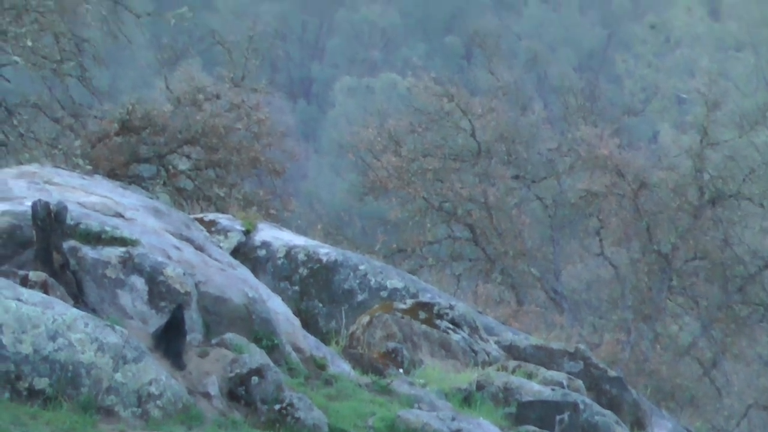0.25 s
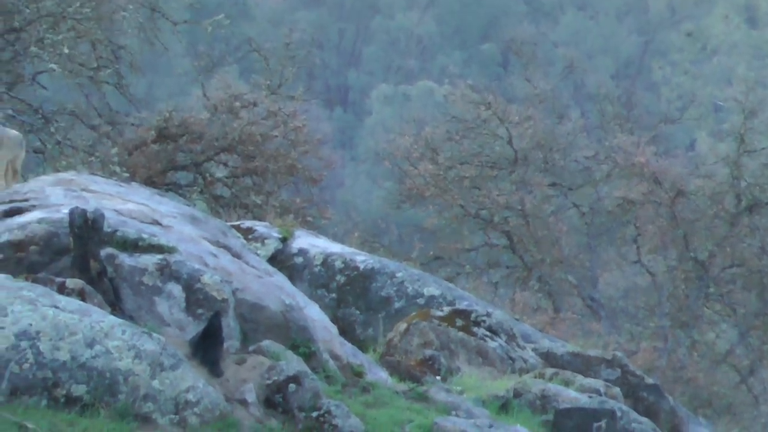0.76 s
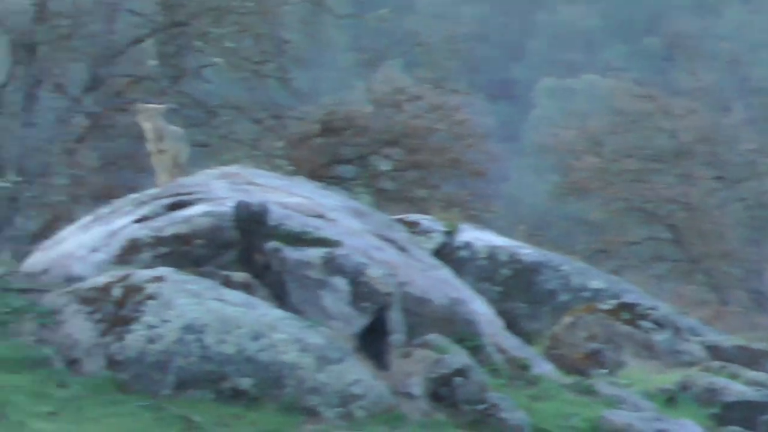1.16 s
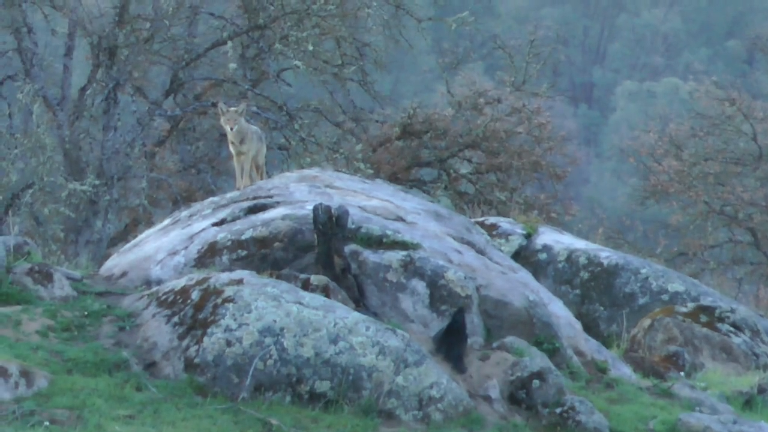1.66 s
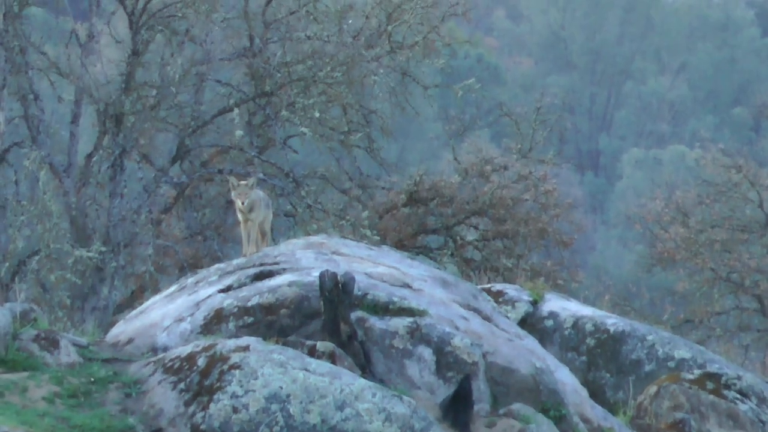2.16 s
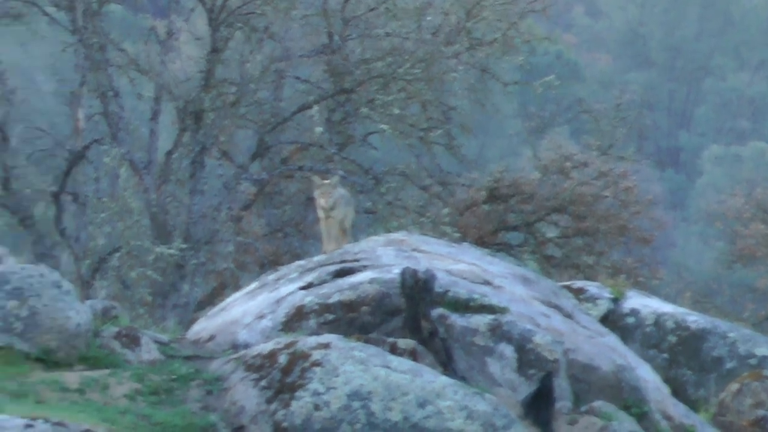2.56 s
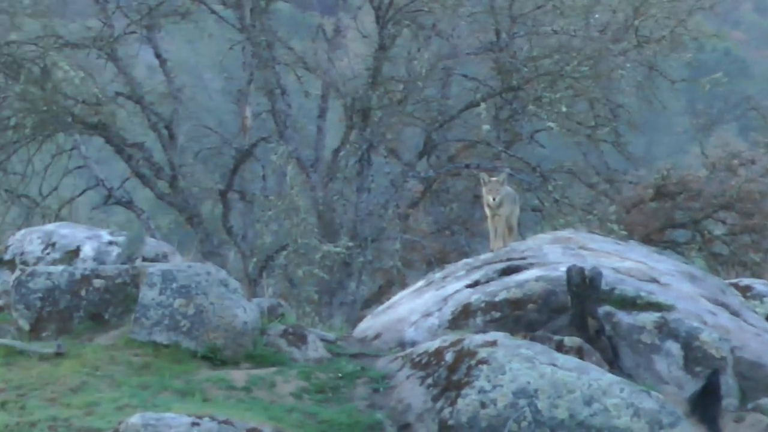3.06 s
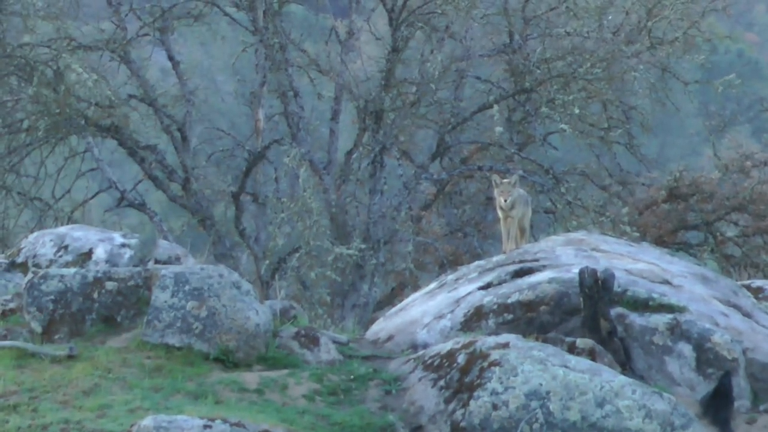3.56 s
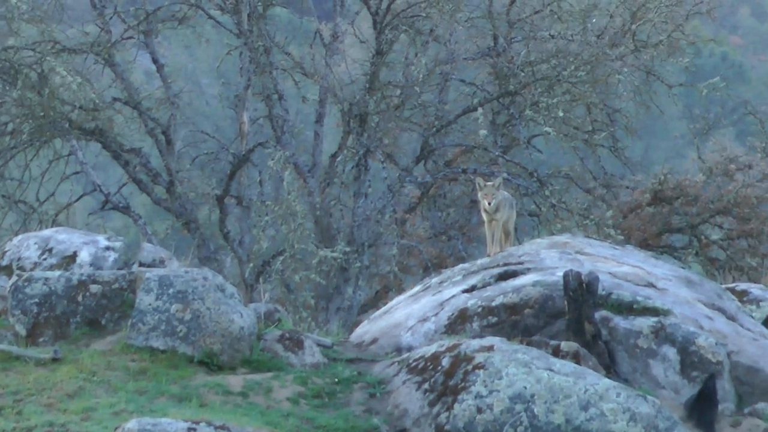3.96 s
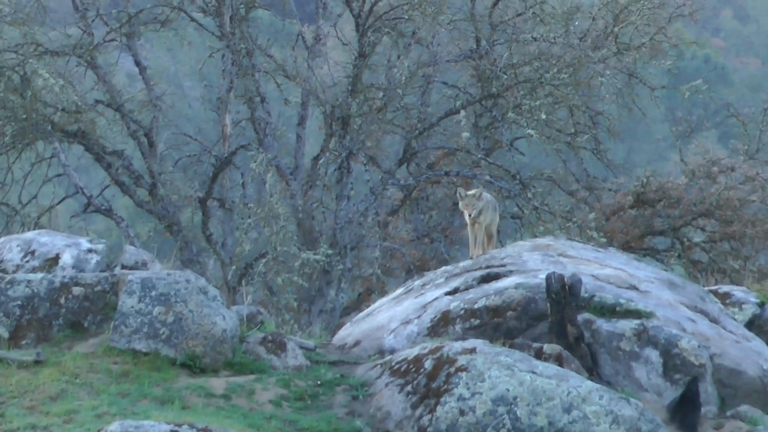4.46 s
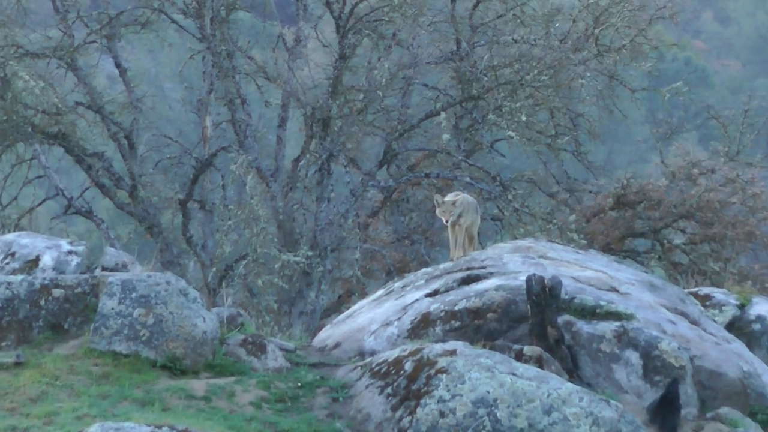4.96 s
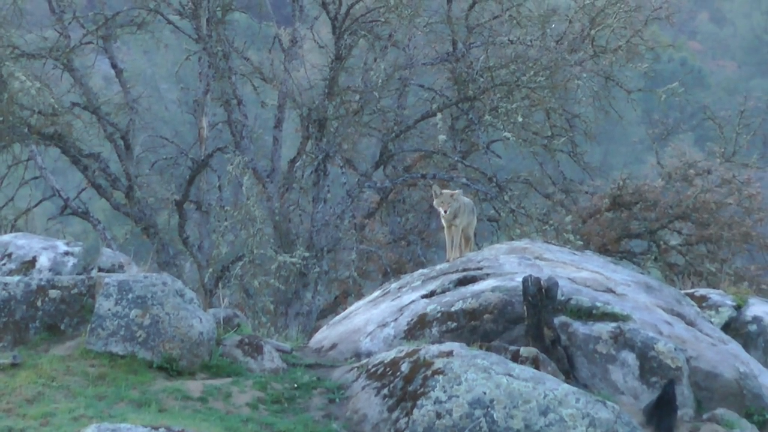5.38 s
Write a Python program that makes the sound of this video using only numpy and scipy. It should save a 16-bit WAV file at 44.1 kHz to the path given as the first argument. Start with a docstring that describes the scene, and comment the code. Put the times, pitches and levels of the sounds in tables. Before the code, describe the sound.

Five hoarse, yelping coyote barks ring across an open hillside among chirping birds, faint rumble and hiss, and a few camera handling clicks.

```python
"""A wooded hillside: on a boulder a coyote gives five rough barks, a falling tone of fluttering vocal folds
shaped by throat and mouth; each drops in pitch at a break and dies away into a whine.
Small birds whistle and buzz in the trees as trembling sines, and slopes and trees answer with noise-like echoes.
Low rumble and faint hiss, both coloured noise, lie beneath; damped rings make the hand-held camera's clicks."""
import sys
import numpy as np
from scipy import signal
from scipy.fft import rfft, irfft, next_fast_len
from scipy.io import wavfile
from scipy.ndimage import uniform_filter1d

SR = 44100
rng = np.random.default_rng(int(sys.argv[2]) if len(sys.argv) > 2 else 0)


def unload_wav(signal):
    """Save mono or channel-first audio to the path in sys.argv[1] as 16-bit WAV at rate SR, clipped to [-1, 1]."""
    wavfile.write(
        sys.argv[1],
        SR,
        np.round(np.clip(np.atleast_2d(signal).T, -1, 1) * 32767).astype(np.int16),
    )


N = 247842
TIME = np.arange(N) / SR


def from_db(db):
    """Amplitude gain of a level in dB."""
    return 10 ** (np.asarray(db) / 20)


def rms_one(x):
    """Scale to an rms of 1."""
    return x / np.sqrt(np.mean(x ** 2) + 1e-20)


def in_time(rows, t):
    """The columns of a curve, read at the times t."""
    s, *columns = np.transpose(rows)
    return [np.interp(t, s, column) for column in columns]


def colour(x, points, power=1):
    """Filter by a (f/Hz, level/dB) spectrum raised to a power."""
    size = next_fast_len(x.shape[-1] + 4096)
    hz, db = np.transpose(points)
    bins_hz = np.maximum(np.arange(size // 2 + 1) * SR / size, 1)
    gain = from_db(power * np.interp(np.log(bins_hz), np.log(hz), db))
    return irfft(rfft(x, size) * gain, size)[..., :x.shape[-1]]


def cut(x, hz, kind, order=2):
    """Low-, high- or band-pass filter."""
    edges_hz = np.clip(hz, 10, .45 * SR)
    return signal.sosfilt(signal.butter(order, edges_hz, kind, fs=SR, output="sos"), x)


def formant(x, hz, width_hz):
    """A resonance with gain 1 at its peak."""
    return signal.lfilter(*signal.iirpeak(hz, hz / width_hz, fs=SR), x)


def wander(rate_hz, size):
    """Smooth random drift up to a given rate, with an rms of 1."""
    settle = 8000
    return rms_one(cut(rng.standard_normal(size + settle), rate_hz, "low")[settle:])


def level_out(x):
    """Hold the short-time rms near 1, so that the envelope sets the loudness."""
    power = uniform_filter1d(uniform_filter1d(x * x, 700), 700)
    return x / np.sqrt(np.maximum(power, 0) + 1e-12)


def fade(t, edge_s):
    """Soft start and stop."""
    return np.sin(np.pi / 2 * np.clip(np.minimum(t - t[0], t[-1] - t) / edge_s, 0, 1)) ** 2


def ease(age, at_s, over_s):
    """A smooth step from 0 to 1."""
    return .5 + .5 * np.tanh((age - at_s) / over_s)


def turn(hz):
    """Phase of a moving frequency."""
    return 2 * np.pi * np.cumsum(hz) / SR


def add(out, sound, t):
    """Mix a sound in at its times."""
    start = round(t[0] * SR)
    out[start:start + len(sound)] += sound


def air_noise(spectrum, side_share, pan_db):
    """Coloured noise: a shared centre plus a weaker, opposed part that widens it."""
    mid, side = colour(rng.standard_normal((2, N)), spectrum)
    wide = rms_one(mid) + side_share * rms_one(side) * np.array([[1], [-1]])
    return wide * from_db([[pan_db / 2], [-pan_db / 2]])


# level of the background over time: (t/s, rumble level/dB, leaf hiss level/dB)
AIR_LEVELS = [(0, -61.5, -57), (.85, -63.5, -55), (1.05, -67.5, -64), (2.3, -65.5, -63.5), (2.75, -62, -60),
              (3.3, -61, -60.5), (3.8, -60.5, -57.5), (4.8, -59, -56), (5.62, -59.5, -55)]
# spectrum of the low rumble: (f/Hz, level per Hz/dB)
RUMBLE_SPECTRUM = [(15, -76), (25, -16), (97, 0), (167, -5.5), (253, -0.5), (415, -2.5), (490, -11),
                   (532, -5.5), (660, -10), (766, -1.5), (904, -23), (1220, -16.5), (1300, -35.5),
                   (1690, -11.5), (2860, -120)]
# spectrum of the trees' distant rustle: (f/Hz, level per Hz/dB)
LEAF_SPECTRUM = [(700, -6), (1300, -3), (1750, 5.5), (2600, 7), (3700, 6), (4800, -0.5), (6500, -4),
                 (8500, -11), (12000, -10), (15500, -13)]


def air():
    """The background level changes over time, following one curve for the rumble and one for the leaf hiss,
    above a steady microphone hiss."""
    rumble_db, hiss_db = in_time(AIR_LEVELS, TIME)
    rumble = from_db(rumble_db) * air_noise(RUMBLE_SPECTRUM, side_share=0.53, pan_db=-4.0)
    leaves = from_db(hiss_db) * air_noise(LEAF_SPECTRUM, side_share=0.04, pan_db=0.5)
    microphone_hiss = from_db(-72.0) * rng.standard_normal(N)
    return rumble + leaves + microphone_hiss


# tone of the hillside's answer: (f/Hz, level/dB)
HILLSIDE_TONE = [(1000, 6), (1700, 3.5), (2200, -1.5), (4000, 6), (6000, -5), (10000, -1)]


def hillside(x, t60=0.81, far_db=-31, near_t60=0.03, near_db=-21):
    """Nearby rocks scatter the sound early; trees and slopes send back a faint long tail."""
    age = TIME[:2 * SR]
    build_up = np.clip(age / .015, 0, 1)
    near, far = rng.standard_normal((2, 2, len(age))) * build_up
    near = rms_one(near * from_db(-60 * age / near_t60))
    far = rms_one(far * from_db(-60 * age / t60))
    mid, side = (from_db(near_db) * near + from_db(far_db) * far) / np.sqrt(len(age))
    response = colour(mid + 0.11 * side * np.array([[1], [-1]]), HILLSIDE_TONE)
    return signal.fftconvolve(x[None], response, axes=1)[:, :N]


def rustle(start=4.8, end=4.9, level_db=-55):
    """A brief airy brush of coloured noise."""
    t = TIME[(TIME >= start) & (TIME <= end)]
    noise = colour(rng.standard_normal(len(t)), [(1000, -18), (3000, -10), (14000, -21.0)])
    return from_db(level_db) * fade(t, 0.0069) * rms_one(noise), t


# camera handling clicks: (t/s, starting level of the ring/dB, ring f/Hz, crack level relative to the ring/dB)
CAMERA_CLICKS = [ (1.112, -35, 2070, -9), (1.238, -54, 4000, 11), (1.599, -29, 2160, -20),
                 (1.602, -42, 236, -30), (1.632, -33.5, 2930, -11), (1.636, -32.5, 2670, -17),
                 (1.66, -34, 2650, -9), (1.718, -34, 4590, 1), (1.723, -34.5, 6440, -7),
                 (2.091, -43.5, 390, -33), (5.346, -44.5, 5800, 17)]


def clicks(ring_t60=0.019, crack_t60=0.018):
    """A short noise crack and one damped ring of the camera body."""
    out, age = np.zeros(N), TIME[:SR // 10]
    for s, ring_db, hz, crack_db in CAMERA_CLICKS:
        ring = np.sin(2 * np.pi * hz * age) * from_db(-60 * age / ring_t60)
        noise = cut(rng.standard_normal(len(age)), [1500, 8000], "band")
        crack = noise * from_db(crack_db - 60 * age / crack_t60)
        add(out, from_db(ring_db) * (ring + crack), s + age)
    return out


def whistle(start, end, first, middle, last, buzz, level_db, buzz_depth=0.095):
    """A near sine curving through three pitches; a fast tremble makes it buzz."""
    t = TIME[(TIME >= start) & (TIME <= end)]
    curve = np.polyfit([0, .5, 1], [first, middle, last], 2)
    pitch = np.polyval(curve, np.linspace(0, 1, len(t)))
    tremble = .005 * wander(80, len(t)) + buzz_depth * buzz ** 2 * wander(380, len(t))
    note = rms_one(np.sin(turn(pitch * (1 + tremble))) * from_db(2 * wander(59, len(t))))
    swell = fade(t, (end - start) / 2) ** .3
    return from_db(level_db) * swell * fade(t, .003) * note, t


# bouts of fainter, overlapping twitter from birds farther off: (start t/s, end t/s, note level/dB)
TWITTER_BOUTS = [ (0.0, 0.496, -64), (0.95, 1.551, -65.5), (2.1, 3.305, -73.5), (3.65, 5.2, -65)]


def twitter(notes_per_s=13):
    """Each bout scatters short whistles at random times and pitches."""
    out = np.zeros(N)
    for begin, end, level_db in TWITTER_BOUTS:
        # columns: start t/s, length/s, middle f/Hz, first and last pitch as a share of it
        lowest, highest = [max(begin, 0), .03, 2700, .8, .75], [end, .09, 5400, 1.2, 1.15]
        notes = rng.uniform(lowest, highest, (24, 5))
        for start, length, hz, first, last in notes[:round(notes_per_s * (end - begin))]:
            add(out, *whistle(start, start + length, hz * first, hz, hz * last, .3, level_db))
    return out


# one thin, high warble: (t/s, fundamental f/Hz)
WARBLE_PITCH = [(4.35, 5240), (4.4, 5950), (4.51, 5160), (4.66, 5850), (4.75, 6700), (4.79, 5800)]


def warble(level_db=-64, fundamental_db=-6):
    """A thin wavering whistle whose octave is stronger than its fundamental."""
    t = TIME[(TIME >= WARBLE_PITCH[0][0]) & (TIME <= WARBLE_PITCH[-1][0])]
    pitch, = in_time(WARBLE_PITCH, t)
    phase = turn(pitch * (1 + 0.0065 * wander(55, len(t))))
    tone = np.sin(2 * phase) + from_db(fundamental_db) * np.sin(phase)
    note = tone * from_db(2.4 * wander(21, len(t)))
    return from_db(level_db) * fade(t, 0.014) * note, t


# short curved notes: (start t/s, length/s, middle f/Hz, rise from first to last pitch/octaves, level/dB)
BIRD_CHIRPS = [ (0.04, 0.037, 3280, -0.6, -48.5), (0.137, 0.029, 3880, -.35, -44.5),
               (0.231, 0.089, 3250, -0.29, -47.5), (0.421, 0.037, 3775, -0.63, -43.5),
               (0.994, 0.061, 4790, -0.52, -59.5), (1.081, 0.053, 4040, 0.2, -57),
               (1.141, 0.048, 5270, 0.3, -64), (1.482, 0.029, 4570, 0.74, -64),
               (3.673, 0.04, 3700, -0.11, -49.5), (3.897, 0.03, 3924, -0.34, -45.5),
               (3.993, .091, 3337, -0.44, -46.5), (4.188, 0.036, 3600, 0.47, -43.5),
               (4.24, 0.038, 3760, 0.33, -45.5), (4.584, 0.037, 4110, 0.18, -48.5),
               (5.57, 0.033, 3700, -.5, -54.5)]
# drawn-out whistles: (start t/s, length/s, first f/Hz, last f/Hz, level/dB)
BIRD_SLURS = [ (0.042, 0.026, 1677, 1730, -51.5), (0.445, 0.052, 3200, 2255, -53),
              (0.632, 0.09, 6820, 8850, -58), (1.289, 0.054, 5560, 3740, -58),
              (3.044, 0.089, 3920, 3890, -60), (3.333, .065, 4530, 3560, -50),
              (3.386, 0.079, 6900, 9000, -60.5), (4.047, 0.31, 5680, 4040, -51),
              (4.535, 0.0645, 4276, 3840, -45.5), (4.695, 0.099, 3890, 3023, -46),
              (5.081, 0.13, 6680, 4660, -58.5)]
# buzzing notes: (start t/s, length/s, middle f/Hz, level/dB)
BIRD_BUZZES = [ (0.025, 0.057, 4900, -52), (3.191, 0.028, 4055, -52.5), (3.773, 0.081, 4700, -53),
               (4.341, 0.061, 3754, -49), (4.445, 0.059, 4165, -48), (4.661, 0.042, 4280, -49),
               (4.949, 0.24, 3480, -47.5)]
CHIRP_ARCH_OCTAVES = 0.33   # the two ends lie this far below the middle on average
SLUR_MIDDLE_SHARE = .2   # halfway through, a slur is this share of its span above its low end
BUZZ_SAG_HZ_PER_S = 4600
CHIRP_BUZZ, SLUR_BUZZ, BUZZ_AMOUNT = .2, .12, .85


def birds():
    """Chirps, slurs, buzzes and a warble, with bouts of faint random twitter."""
    out = twitter()
    for start, length, middle, rise, level_db in BIRD_CHIRPS:
        first, last = middle * 2 ** (np.array([-rise, rise]) / 2 - CHIRP_ARCH_OCTAVES)
        add(out, *whistle(start, start + length, first, middle, last, CHIRP_BUZZ, level_db))
    for start, length, first, last, level_db in BIRD_SLURS:
        middle = min(first, last) + SLUR_MIDDLE_SHARE * abs(first - last)
        add(out, *whistle(start, start + length, first, middle, last, SLUR_BUZZ, level_db))
    for start, length, hz, level_db in BIRD_BUZZES:
        sag = BUZZ_SAG_HZ_PER_S * length / 2
        add(out, *whistle(start, start + length, hz + sag, hz, hz - sag, BUZZ_AMOUNT, level_db))
    add(out, *warble())
    return out


# every bark slides down onto its pitch, swells and is let go into a thin whine
SLIDE_SHARE, ATTACK_DB, WHINE_FADE_S = .24, 15, .019
# at the break the pitch drops and the roughness changes
BREAK_S = .005
# in the tail the pitch glides to the whine and the folds settle almost clean
TAIL_S, WHINE_LAG_S, WHINE_GLIDE_S, WHINE_ROUGH, CLEARING_LAG_S = 0.1, 0.00877, 0.0126, 0.043, .05
# upper against lower voice: its base level, the changes once broken and in the whine,
# and the share of the surge that it misses
UPPER_DB, UPPER_BROKEN_DB, UPPER_WHINE_DB, UPPER_MISSES_SHARE = -8.5, 3.5, -3, 0.37
# the upper voice and the roughness come in as the slide ends, after this many slide times
OPENING_SLIDES, OPENING_UPPER_DB = 1.32, -8.5
# the voice is never quite steady
WAVER_SHARE, WAVER_DB, WAVER_HZ = 0.0086, 1.0, 30


def gesture(start, attack_s, pitch_hz, slide_s, sag_hz_per_s, whine_hz, level_db, surge_s, surge_width_s, surge_db,
            break_s, drop_share, release_s, release_db_per_s, whine_db,
            roughness, broken_roughness, shrill_db, fundamental_db, jaw_db_per_s):
    """Times and voice controls of one bark: slide in, surge, break, release, whine."""
    t = TIME[(TIME >= start) & (TIME <= start + release_s + TAIL_S)]
    age = t - t[0]
    opened = ease(age, OPENING_SLIDES * slide_s, slide_s / 2)
    broken = ease(age, break_s, BREAK_S)
    cleared = ease(age, release_s + CLEARING_LAG_S, WHINE_GLIDE_S)

    slide = 1 + SLIDE_SHARE * np.exp(-age / slide_s)
    pitch = (pitch_hz - sag_hz_per_s * age) * slide * (1 - drop_share * broken)
    pitch = pitch + (whine_hz - pitch) * ease(age, release_s + WHINE_LAG_S, WHINE_GLIDE_S)
    pitch = pitch * (1 + WAVER_SHARE * wander(WAVER_HZ, len(t)))

    rough = opened * (roughness + (broken_roughness - roughness) * broken)
    rough = rough + (WHINE_ROUGH - rough) * cleared

    push_db = surge_db * np.exp(-((age - surge_s) / surge_width_s) ** 2)
    release_db = release_db_per_s * np.maximum(age - release_s, 0)
    effort_db = np.maximum(level_db + push_db - release_db, whine_db)
    effort_db = effort_db - ATTACK_DB * (np.exp(-age / attack_s) + np.exp((age - age[-1]) / WHINE_FADE_S))
    effort_db = effort_db + WAVER_DB * wander(WAVER_HZ, len(t))

    upper_db = (UPPER_DB + OPENING_UPPER_DB * (1 - opened) + shrill_db * (1 - broken) + UPPER_BROKEN_DB * broken
                + UPPER_WHINE_DB * cleared - UPPER_MISSES_SHARE * push_db)
    # the jaws close after the break, so the fundamental gains on the rest
    jaw_db = fundamental_db + jaw_db_per_s * np.maximum(age - break_s, 0)
    return t, pitch, rough, effort_db, upper_db, jaw_db


# a second, slower vibration of the folds puts a side tone above the second harmonic
SIDE_TONE_HZ, SIDE_TONE_DB = 240.2, -8


def vocal_folds(pitch, rough, jitter, flutter_hz, rasp):
    """Folds sing harmonics; pushed hard, they flutter and their tone gives way to rasping air."""
    size = len(pitch)
    phase = turn(pitch * (1 + jitter * rough * wander(157, size)))
    # uneven cycles give every harmonic a skirt; roughness weakens the higher ones
    tone = 0
    for k in range(1, 13):
        line = np.sin(k * phase + rng.uniform(0, 2 * np.pi))
        skirt = rough * wander(122, size) * np.cos(k * phase)
        drowning = np.exp(-1.1 * rough * np.clip(k - 2, 0, 4))
        tone = tone + (line + skirt) * drowning / np.hypot(1, k / 6)
    side_phase = turn(SIDE_TONE_HZ * (1 + .2 * wander(25, size)))
    tone = tone + from_db(SIDE_TONE_DB) * np.sqrt(rough) * np.sin(2 * phase + side_phase)
    turbulence = 4.23 * rasp * cut(rng.standard_normal(size), 1420, "high") * (1 + .5 * np.cos(phase))
    # loose tissue chops the flow at an unsteady low rate
    flutter = np.exp(.62 * rough * np.sin(turn(flutter_hz * (1 + .25 * wander(60, size)))))
    return flutter * (np.sqrt(1 - rough ** 2) * tone + rough ** 1.16 * turbulence)


# slope of the throat and open mouth: (f/Hz, level/dB)
THROAT_SLOPE = [(350, -17), (600, -24), (830, -14.5), (1120, -10), (1570, -10), (1670, 2.5), (2400, -6.5),
                (3080, -19), (4400, -22.5), (5300, -33.5), (8300, -42), (9500, -30), (10800, -41),
                (15000, -51)]
# sharp resonances on that slope: (f/Hz, width/Hz, lift level/dB)
THROAT_FORMANTS = [(1728, 25, 10.5), (2253, 107, 8), (3380, 133, 14.5), (3960, 164, 12.5)]


def throat(flow, upper_db, ring_hz, ring_width_hz, ring_db):
    """Throat and mouth slope the spectrum and ring at their resonances."""
    voice = colour(flow, THROAT_SLOPE)
    for hz, width_hz, lift_db in THROAT_FORMANTS:
        voice = voice + (from_db(lift_db) - 1) * formant(voice, hz, width_hz)
    # resonances near the third harmonic and high in the treble turn the voice shrill
    shrill = formant(voice, ring_hz, ring_width_hz) + .5 * formant(voice, 9200, 1650)
    return voice + from_db(ring_db + np.minimum(upper_db, 4)) * shrill


def bark(t, pitch, rough, level_db, upper_db, jaw_db, jitter=0.038, flutter_hz=120, rasp=1.37,
         ring_hz=2880, ring_width_hz=190, ring_db=11, fundamental_db=-21):
    """The folds drive the throat; effort and jaw set the balance of fundamental, body and upper voice."""
    flow = vocal_folds(pitch, np.clip(rough, 0, .95), jitter, flutter_hz, rasp)
    voice = throat(flow, upper_db, ring_hz, ring_width_hz, ring_db)
    base = colour(voice, [(1100, 0), (1500, -50)])
    upper = colour(voice, [(2400, -30), (2700, 0)])
    body = voice - base - upper
    base_gain = from_db(np.minimum(fundamental_db + jaw_db, 4))
    lower = (base_gain * level_out(base) + level_out(body)) / np.hypot(1, base_gain)
    return from_db(level_db) * fade(t, 0.0021) * (lower + from_db(upper_db) * level_out(upper)), t


# one row per bark; levels are those of the voice before the direct sound is trimmed:
# (start t/s, attack/s, settled f/Hz, slide/s, sag/(Hz per s), whine f/Hz, level/dB,
#  surge after/s, surge width/s, surge level/dB, break after/s, pitch drop at the break/share,
#  release after/s, release/(dB per s), whine level/dB, roughness/0-1, roughness once broken/0-1,
#  upper-voice lift before the break/dB, fundamental lift/dB, jaw closing/(dB per s))
COYOTE_BARKS = [ (0.550, 0.025, 950.5, .005, 329.5, 673, -35.5, 0.24, 0.068, 9, 0.25, 0.051, 0.3, 203, -69, 0.57, 0.41, 2, 4.5, 172),
                (1.745, 0.034, 882.3, .022, 7.5, 1020, -31.5, 0.11, 0.085, 14, .076, 0.055, 0.17, 282, -36, 0.28, 0.63, 4.5, -1, 9.4),
                (2.801, 0.012, 946.7, 0.0074, 210, 846, -29, 0.084, 0.038, 4, 0.14, 0.065, .17, 275, -53, 0.3, 0.71, 7.5, -3, 224),
                (3.439, 0.012, 924, 0.0089, 380.5, 947, -29, 0.13, 0.02, 4, .125, .08, 0.17, 336, -52, 0.38, 0.7, 3, 1.5, 160),
                (5.268, 0.02, 982, 0.011, -5.5, 958, -34.5, 0.17, 0.014, 7.5, 0.18, 0.15, 0.21, 155, -50, 0.19, 0.79, 13, 2.5, 172)]


def coyote_voice():
    """Each row shapes one bark's gesture, which the vocal folds and throat then sound."""
    voice = np.zeros(N)
    for row in COYOTE_BARKS:
        add(voice, *bark(*gesture(*row)))
    return voice


# side of the coyote: (f/Hz, left minus right level/dB)
COYOTE_PAN = [(700, -10), (1300, -5.5), (2400, -6.8), (4400, -5), (12000, -3.2)]


def scene():
    """Air, birds in the trees, handling noises, and the coyote with its echoes."""
    song = birds()
    trees = hillside(song, t60=.7, far_db=-16, near_t60=.15, near_db=-9)
    handling = clicks()
    add(handling, *rustle())
    voice = coyote_voice()
    # half the level difference goes to each side
    coyote = from_db(-2.5) * np.array([colour(voice, COYOTE_PAN, power) for power in (.5, -.5)])
    return air() + song + trees + handling + coyote + hillside(voice)


def record(dry, ceiling=0.53, cutoff_hz=15800):
    """The loudest peaks are rounded off and the top is cut steeply."""
    rounded = dry / (1 + (dry / ceiling) ** 4) ** (1 / 4)
    return signal.sosfilt(signal.ellip(12, .1, 90, cutoff_hz, fs=SR, output="sos"), rounded)


dry = scene()
out = record(dry)
unload_wav(out)
```